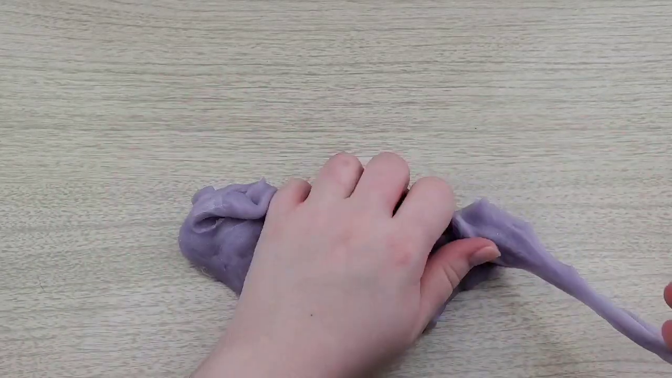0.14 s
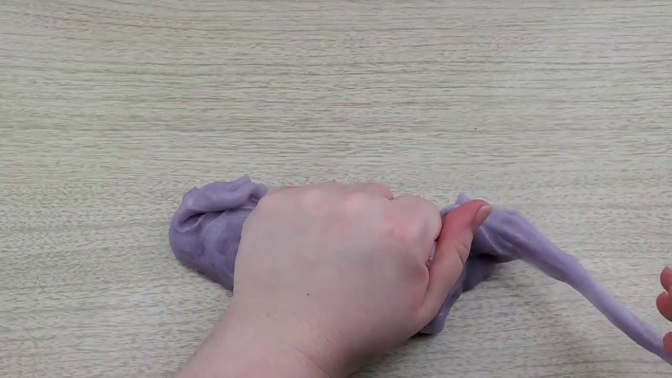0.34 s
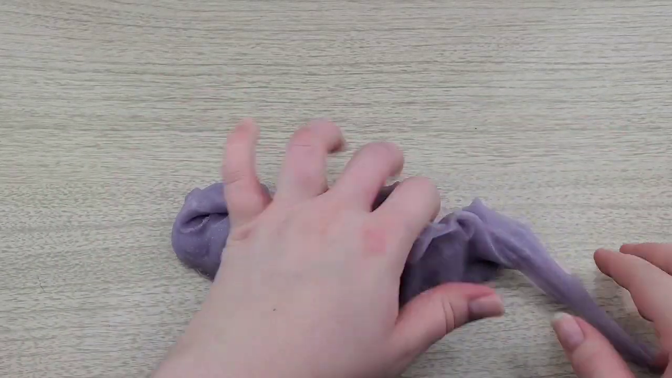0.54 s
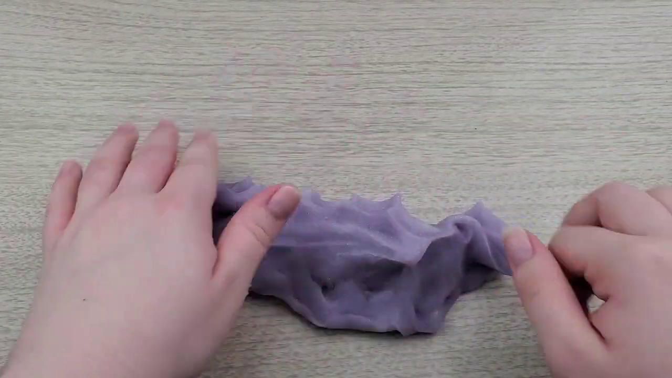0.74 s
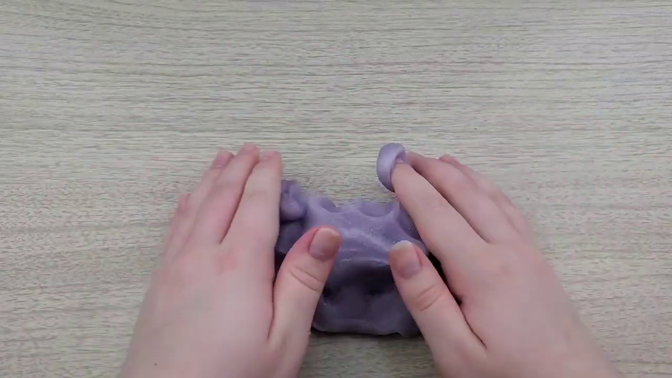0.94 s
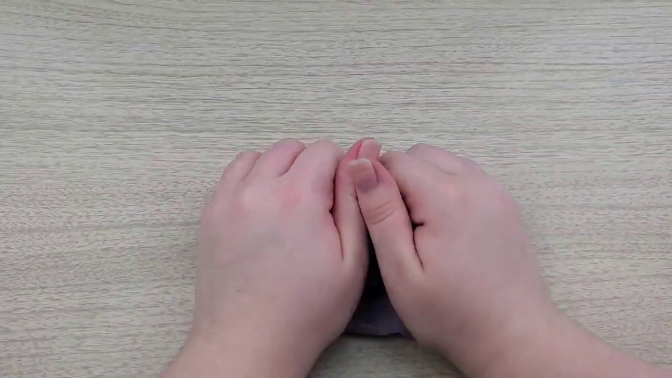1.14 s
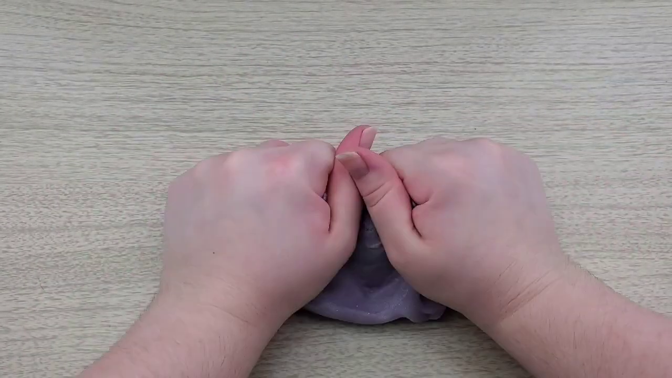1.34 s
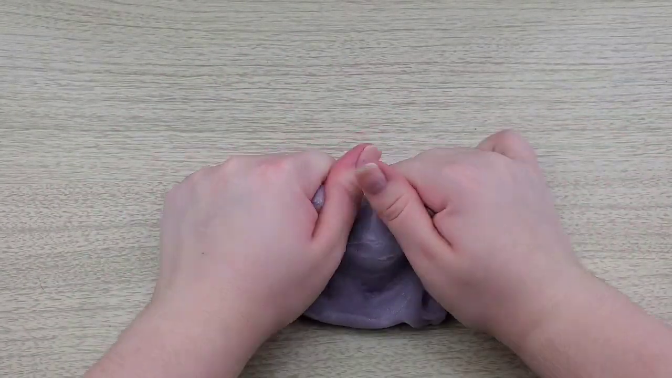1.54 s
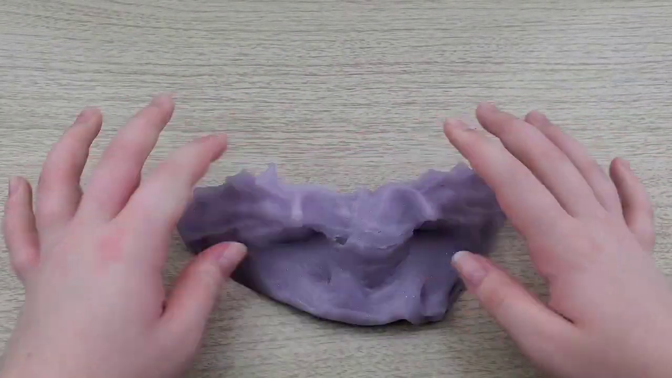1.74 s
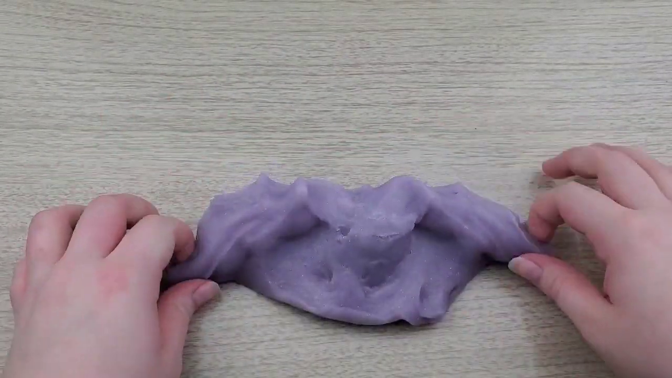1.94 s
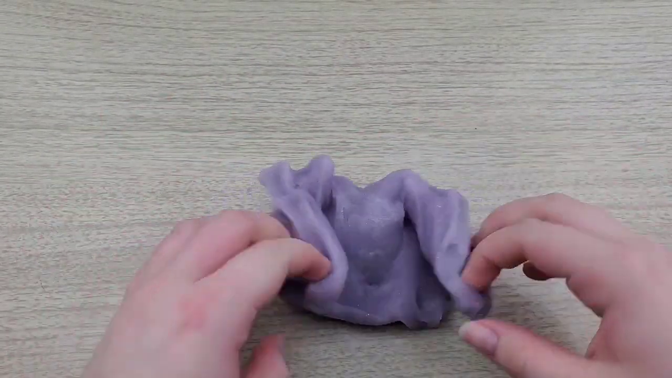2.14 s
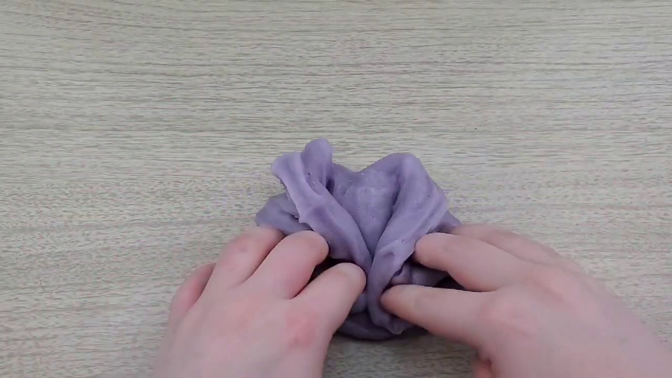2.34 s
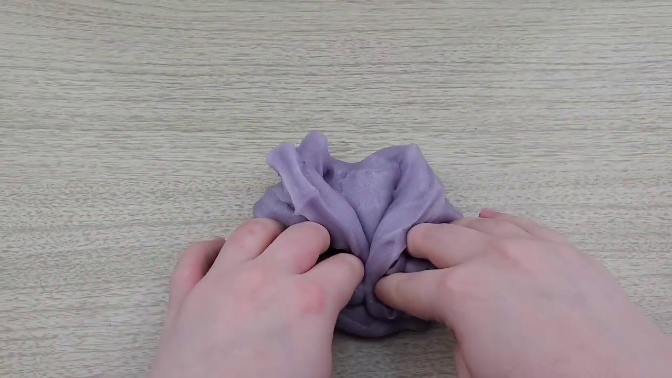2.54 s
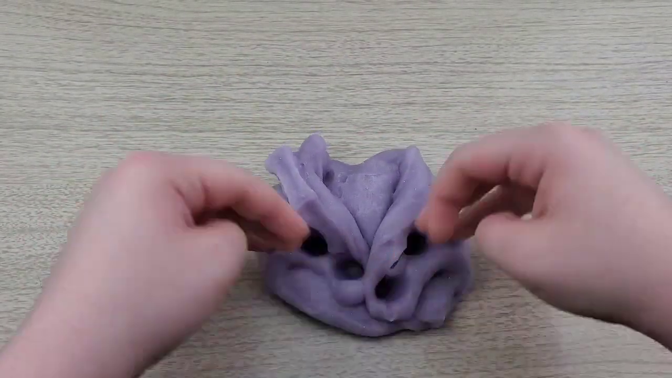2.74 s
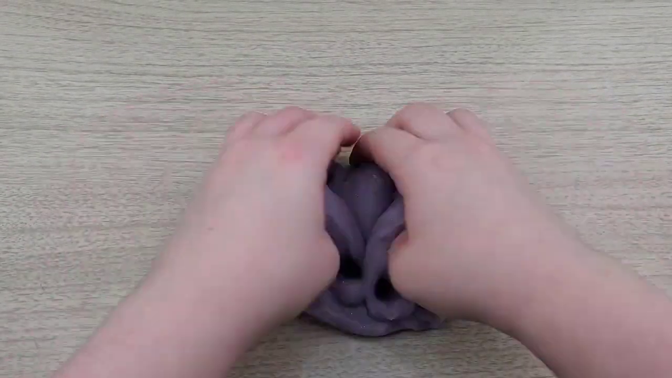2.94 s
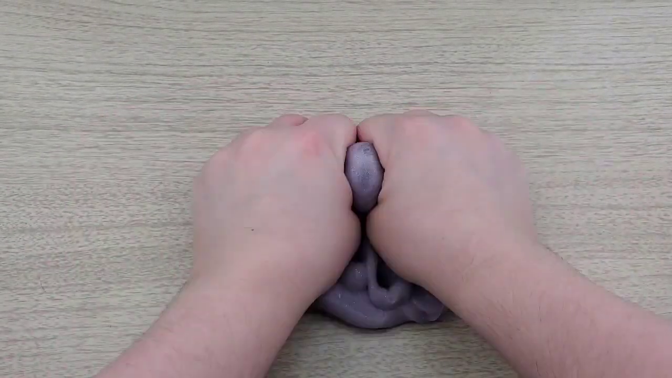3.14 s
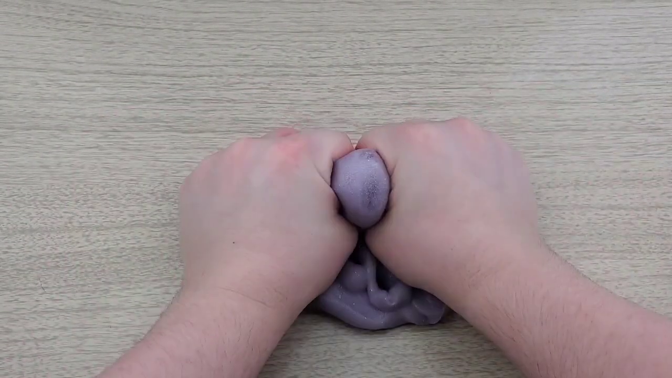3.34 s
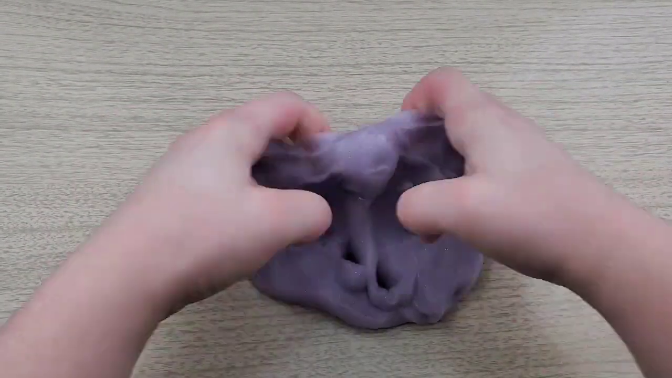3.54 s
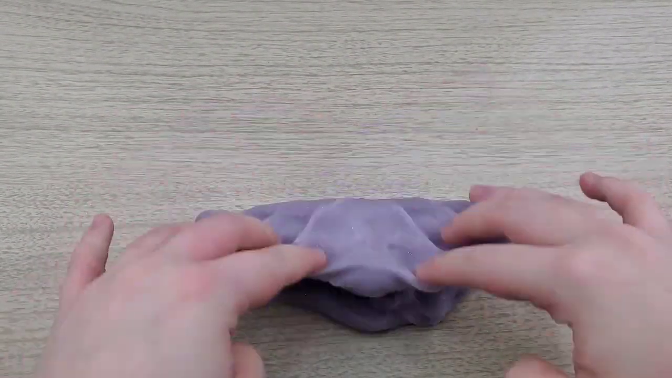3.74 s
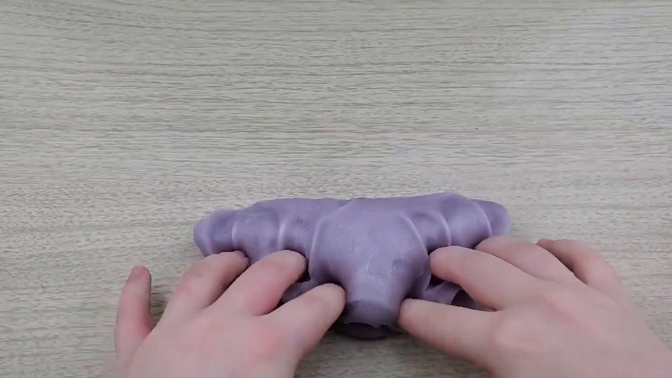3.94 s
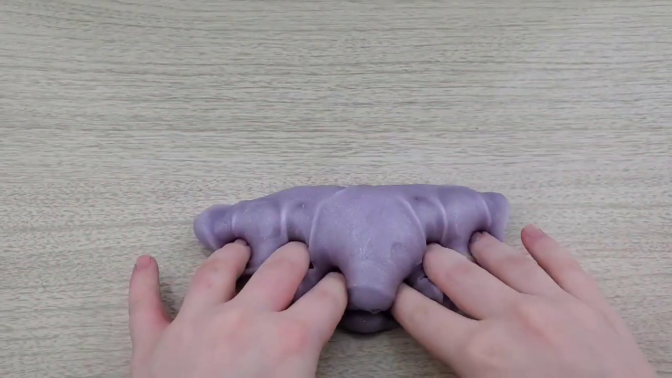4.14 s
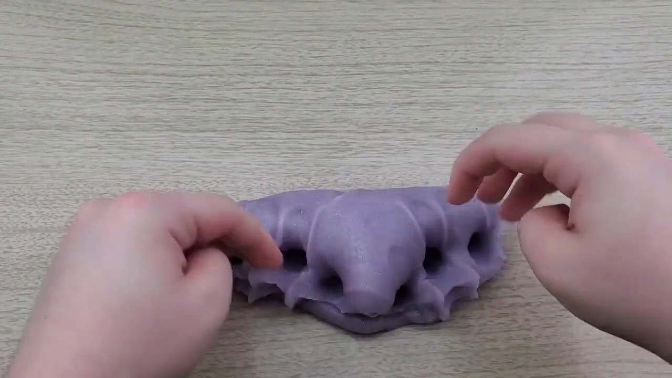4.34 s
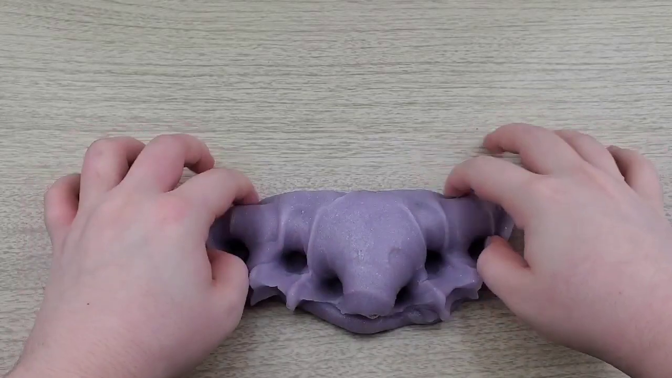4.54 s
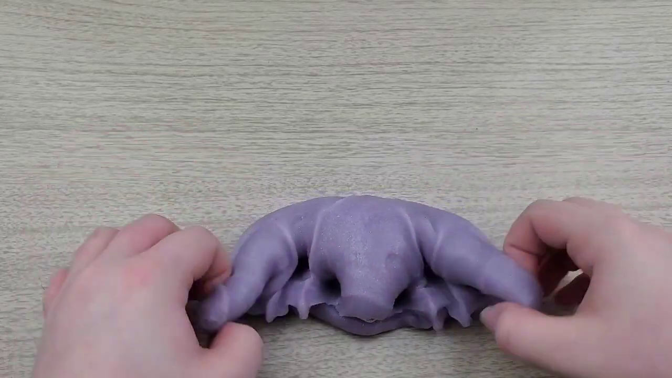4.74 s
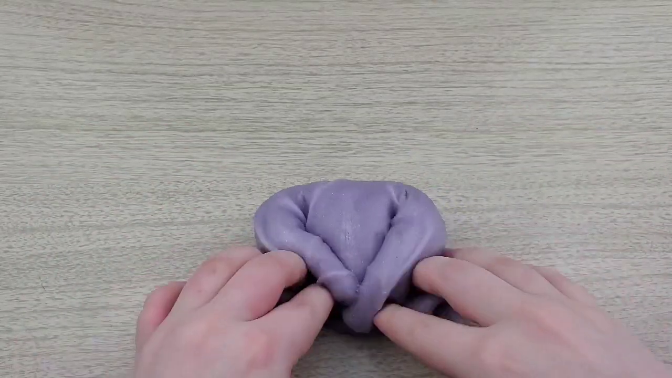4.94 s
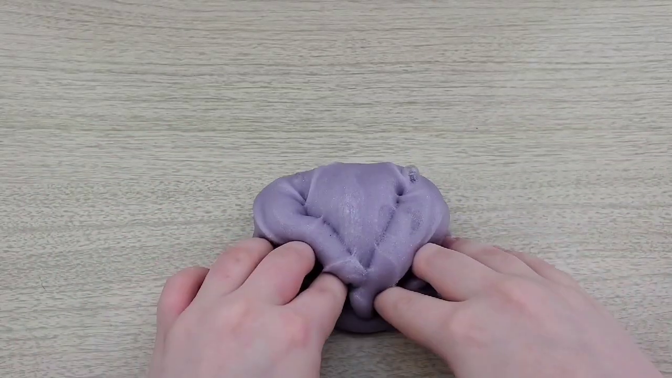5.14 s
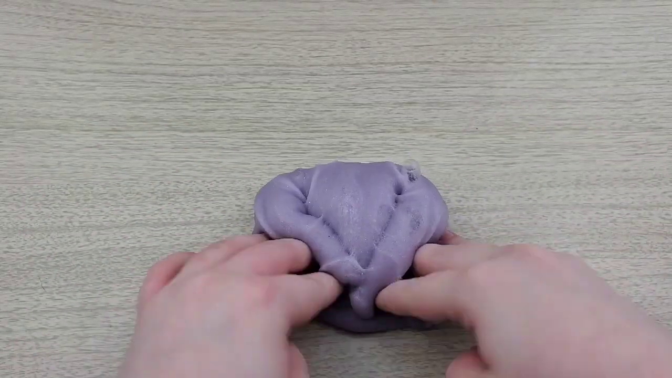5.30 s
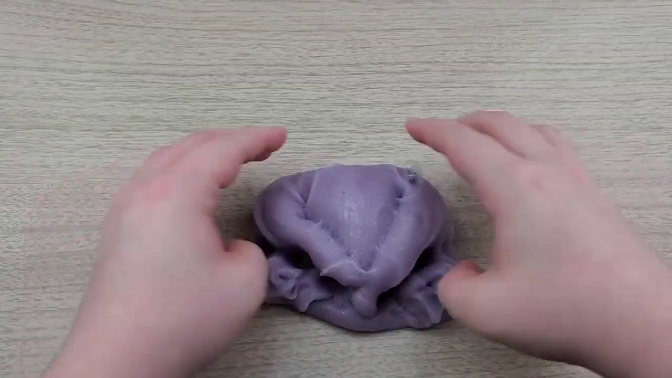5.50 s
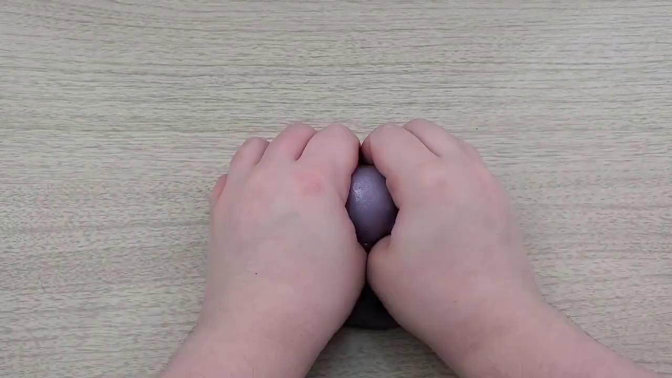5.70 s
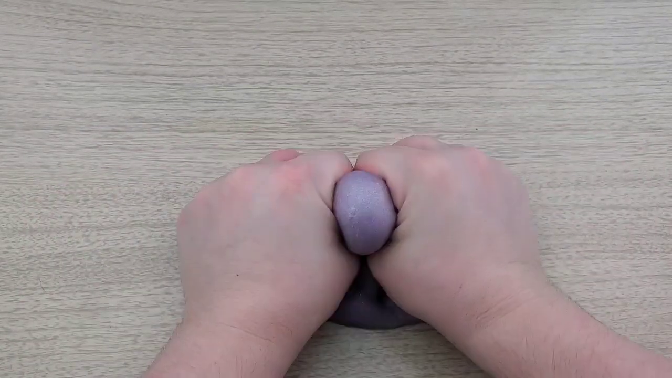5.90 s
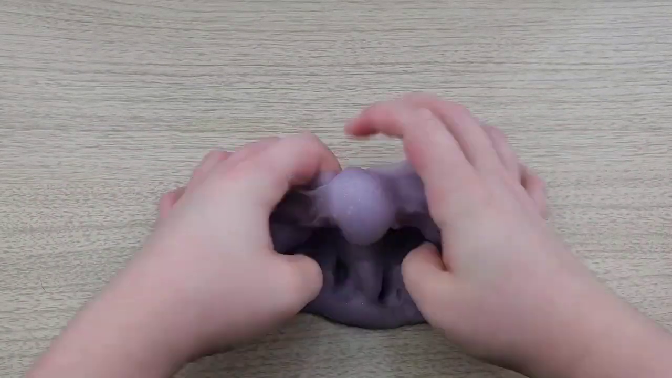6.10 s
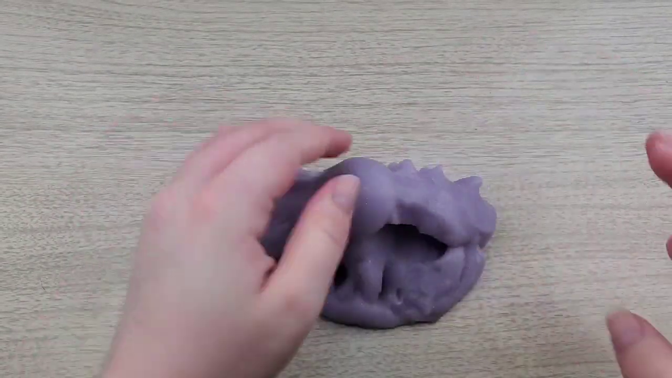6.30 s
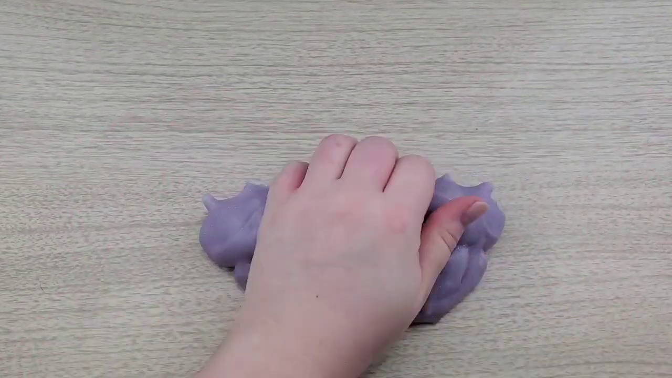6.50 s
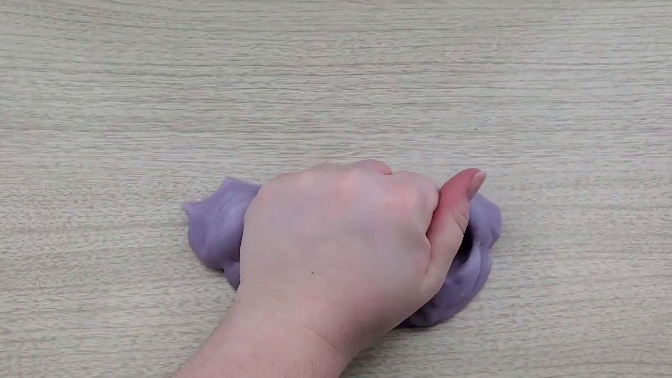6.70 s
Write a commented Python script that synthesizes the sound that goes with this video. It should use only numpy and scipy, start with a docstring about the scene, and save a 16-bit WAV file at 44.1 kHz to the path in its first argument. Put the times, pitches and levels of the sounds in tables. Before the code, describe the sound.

Hands knead thick slime on a wooden table: short bursts of wet squelchy pops, sticky crackles and soft knocks, separated by near-silent gaps.

```python
"""A wooden table top in a small quiet room: two hands knead thick slime close below a pair of microphone ports.
Trapped air pockets burst with a wet pop: torn noise snaps, spits and rings a rising pocket tone.
The sticky skin peels off the fingers with a fine crackle of noise bursts, part of it through hollow resonances.
Finger tips knock the table through the slime and ring its modes; a faint hum and low rumble fill the gaps."""
import sys
import numpy as np
from scipy import signal
from scipy.fft import rfft, irfft, next_fast_len
from scipy.io import wavfile
from scipy.ndimage import uniform_filter1d

SR = 44100
rng = np.random.default_rng(int(sys.argv[2]) if len(sys.argv) > 2 else 0)


def master_out(mix):
    """Clip the mix to full scale and print it as 16-bit PCM to the path in sys.argv[1]."""
    frames = np.transpose(np.atleast_2d(mix))
    ceiling = np.clip(frames, -1, 1)
    pcm = np.round(ceiling * 32767).astype(np.int16)
    wavfile.write(sys.argv[1], SR, pcm)


def boost_factor(decibels):
    """Convert a level in decibels to a linear amplitude factor."""
    exponent = np.asarray(decibels, float) / 20
    return 10 ** exponent


N = 302526
T = np.arange(N) / SR
SPOTS = 5  # places on the lump

# swells of peeling crackle, a pull may take more than one: peak_s, crackle_db, hollow_db, rise_s, fall_s
PEEL = [(0.0, -72, -81, .05, .05), (0.34, -69, -82, 0.035, 0.15), (0.431, -35.5, -47, 0.01, 0.16),
        (0.54, -52, -52, 0.17, 0.073), (0.732, -48, -48, 0.098, 0.072), (1.15, -72.5, -78.5, 0.12, 0.36),
        (1.29, -63, -73.5, 0.17, 0.24), (1.45, -56.5, -60.5, 0.066, 0.18), (1.59, -56.5, -67, 0.14, 0.11),
        (1.766, -49, -51.5, 0.046, .08), (1.829, -45.5, -47, 0.096, 0.11),
        (2.119, -64.5, -70, 0.057, 0.076), (2.292, -63, -73, 0.1, 0.1), (2.551, -70.5, -76.5, 0.23, 0.13),
        (2.78, -93, -76.5, .12, 0.13), (2.919, -64.5, -38.5, 0.019, 0.044),
        (3.21, -57.5, -59.5, 0.069, 0.26), (3.41, -46.5, -56.5, 0.098, 0.12),
        (3.7, -40.5, -41, 0.078, 0.13), (4.05, -77, -81, .25, 0.56), (4.481, -42.5, -69.5, 0.027, 0.1),
        (4.79, -58, -64.5, 0.057, 0.079), (4.951, -68.5, -81, .12, 0.17), (5.22, -72, -79, 0.11, 0.14),
        (5.539, -47.5, -42, 0.024, 0.088), (5.83, -69.5, -73.5, .1, .1), (5.93, -48.5, -57.5, 0.058, .08),
        (6.0, -60, -30, 0.061, 0.041), (6.05, -40, -66, 0.049, 0.18), (6.13, -50.5, -47, .05, 0.086),
        (6.293, -42, -41, 0.085, 0.08), (6.62, -76, -99, 0.05, 0.23), (6.802, -49.5, -52.5, 0.044, 0.048),
        (6.86, -77, -72, 0.055, .05)]


def unit(x):
    """Scale to an rms of 1."""
    return x / np.sqrt(np.mean(x ** 2))


def colour(x, points):
    """Shape the spectrum by (Hz, dB) points, without phase shift; -90 dB outside them."""
    hz, db = np.transpose(points)
    length = x.shape[-1]
    size = next_fast_len(length)
    f = np.arange(size // 2 + 1) * SR / size + 1
    gain = boost_factor(np.interp(np.log(f), np.log(hz), db, left=-90, right=-90))
    return irfft(rfft(x, size) * gain, size)[..., :length]


def band(x, hz, width_hz):
    """One resonance, gain 1 at its centre."""
    return signal.lfilter(*signal.iirpeak(hz, hz / width_hz, fs=SR), x)


def pass_filter(x, order, hz, kind):
    """Butterworth low or high pass."""
    return signal.sosfilt(signal.butter(order, hz, kind, fs=SR, output="sos"), x)


def decay(t, t60_s):
    """Exponential fall by 60 dB in t60_s."""
    return np.exp(-np.log(1000) * t / t60_s)


def pair(size):
    """Noise at two ports a hand apart: the same in the bass, unrelated in the treble."""
    mid, side = rng.standard_normal((2, size))
    side = pass_filter(side, 2, 900, "high")
    return np.array([.88 * (mid + side), mid - side])  # the left port hears a little less


def wander(hold_s):
    """Slow chance of spread 1 that changes over about hold_s."""
    size = int(hold_s * SR) + 1
    smooth = uniform_filter1d(rng.standard_normal(N), size)
    return unit(uniform_filter1d(smooth, size))


def swells(s, db, rise_s, fall_s, drop_db=21.5, roundness=1.68):
    """Level in dB of overlapping swells, drop_db down one rise or fall time from each peak."""
    coarse = T[::64]
    late = coarse - np.asarray(s)[:, None]
    far = np.maximum(-late / np.reshape(rise_s, (-1, 1)), late / np.reshape(fall_s, (-1, 1)))
    # roundness: 1 pointed, 2 round
    power = np.sum(boost_factor(np.asarray(db)[:, None] - drop_db * far ** roundness) ** 2, axis=0)
    return np.interp(T, coarse, 10 * np.log10(power + 1e-14))


def strikes(s, db, shapes):
    """Lay one short shape of given energy at each moment, taking the spots on the lump in turn."""
    out = np.zeros((SPOTS, N + shapes.shape[1]))
    for k, (at, gain, shape) in enumerate(zip(s, boost_factor(db), shapes)):
        i = int(at * SR)
        out[k % SPOTS, i:i + len(shape)] += gain * shape / np.sqrt(np.sum(shape ** 2))
    return out[:, :N]


def background():
    """Table rumble that wavers and swells under the arms, a steady hum, and the room's still air."""
    # weight of the arms coming down on the table: peak_s, rumble_db
    lean = [(0.46, -59), (1.83, -58.5), (2.1, -60), (2.989, -49.5), (3.171, -46), (3.46, -56), (3.72, -47),
            (4.53, -49.5), (4.771, -53.5), (5.6, -50), (5.829, -56.5), (5.98, -58), (6.358, -67),
            (6.86, -59.5)]
    # rumble spectrum: hz, db_per_hz
    rumble_colour = [(20, -31.5), (40, -10), (60, 0.5), (90, -9), (150, -17), (300, -18.5), (420, -48.5)]
    # hum partials: hz, rms_db
    hum_partials = [(190.6, -87.5), (238.3, -84.5), (286, -80.5), (429, -100)]
    # still-air spectrum: hz, db_per_hz
    air_colour = [(100, 2), (300, -12), (400, -15), (800, -24.5), (16000, -32.5)]
    rise_s, fall_s = 0.075, 0.1
    rest_db, waver_db, waver_s, air_db = -68, 0.5, 0.12, -81.5

    s, lean_db = np.transpose(lean)
    arms = boost_factor(swells(s, lean_db, rise_s, fall_s))
    rest = boost_factor(rest_db + waver_db * wander(waver_s))
    common, apart = rng.standard_normal((2, N))
    low = common + .17 * apart * np.array([[1], [-1]])
    rumble = np.hypot(arms, rest) * unit(colour(low, rumble_colour))

    hum = np.zeros(N)
    for hz, db in hum_partials:
        hum += np.sqrt(2) * boost_factor(db) * np.sin(2 * np.pi * (hz * T + rng.random()))
    return rumble + hum + boost_factor(air_db) * unit(colour(pair(N), air_colour))


def peel(per_s=140.0, spread_db=5.0, hiss_db=4.0, smear_s=0.0025, clump_db=2.0, clump_s=0.0064):
    """Tiny threads tear all over the skin, a few much louder; hollows of the hands colour them in clumps."""
    # bright crackle spectrum: hz, db_per_hz
    crackle_colour = [(2200, -20.5), (3300, -6.5), (4600, 2), (8500, -3), (14000, -2.5), (16000, -5)]
    # resonances of cupped hands and folds: centre_hz, width_hz (each of two passes), relative_db
    hollows = [(550, 400, -6), (900, 260, -0.5), (1455, 260, -1), (1840, 1800, -3.5)]
    # wet air squeezed out between closed fists: peak_s, level_db, rise_s, fall_s
    squishes = [(1.4, -67, 0.13, .25), (3.38, -54.5, 0.18, 0.13), (5.9, -55, 0.035, 0.057)]
    # squish resonance: centre_hz, width_hz (each of two passes)
    squish_band = (2380, 2100)

    chance, size = rng.random((2, N))
    ticks = (chance < per_s / SR) * boost_factor(-spread_db * np.log(size + 1e-9))
    bursts = signal.lfilter([1], [1, -np.exp(-1 / (smear_s * SR))], ticks)
    threads = (unit(bursts) + boost_factor(hiss_db)) * pair(N)

    crackle = colour(threads, crackle_colour)
    hollow = np.zeros((2, N))
    for hz, width_hz, db in hollows:
        clumps = boost_factor(db + clump_db * wander(clump_s))
        hollow += clumps * band(band(threads, hz, width_hz), hz, width_hz)
    squish = band(band(threads, *squish_band), *squish_band)

    s, crackle_db, hollow_db, rise_s, fall_s = np.transpose(PEEL)
    crackle_level = boost_factor(swells(s, crackle_db, rise_s, fall_s))
    hollow_level = boost_factor(swells(s, hollow_db, rise_s, fall_s))
    squish_level = boost_factor(swells(*np.transpose(squishes)) + clump_db * wander(clump_s))
    return squish_level * unit(squish) + crackle_level * unit(crackle) + hollow_level * unit(hollow)


def tiny_pockets(count=150, low_hz=1500, high_hz=7500):
    """Small pockets burst at random moments, following the pull on the skin up to a ceiling."""
    # event energy over the crackle level: ring, snap, spit
    over_db, scatter_db = [20, 21.5, 23.5], 6
    top_db = -61.5  # a pull above this crackle level bursts them no louder
    draw, scatter = rng.random((count, 2)), rng.standard_normal((count, 3))
    s = draw[:, 0] * T[-1]
    hz = low_hz + (high_hz - low_hz) * np.sqrt(draw[:, 1])
    at, crackle_db, _, rise_s, fall_s = np.transpose(PEEL)
    pull_db = np.interp(s, T, swells(at, crackle_db, rise_s, fall_s))
    db = np.minimum(pull_db, top_db)[:, None] + scatter_db * scatter
    return np.column_stack([s, hz, db + over_db])


def pops(cycles_at_1k=8.6, glide=0.025, crack=1.6):
    """The film over a pocket tears; it snaps, spits and rings the pocket, which rises as it opens."""
    # pockets bursting at set moments, loud and faint, relative energies:
    # start_s, pitch_hz, ring_db, snap_db, spit_db
    set_pockets = [(0.364, 930, -37, -35, -40), (0.384, 7440, -9, -24, -13), (0.394, 6000, 2, -58, -3),
                   (0.404, 5160, 8, -39, -21), (0.421, 7300, 0.5, -31, -11), (0.445, 5700, -3.5, -12, -3.5),
                   (0.458, 6740, 1, -22, 2.5), (0.473, 6000, -29, -36, -2), (0.528, 930, -17, -14.5, -33),
                   (0.558, 5800, -36, -17, -43), (0.578, 7820, -18.5, -46.5, -26.5),
                   (1.031, 7220, -50.5, -60.5, -39.5), (1.262, 4880, -10.5, -39, -24.5),
                   (1.323, 1560, -40, -45, -40), (1.37, 3520, -33, -50, -41), (1.387, 2740, -40, -60, -46),
                   (1.396, 7440, -33, -44, -30), (1.423, 1480, -23.5, -24, -20),
                   (1.439, 7060, -26, -42, -21), (1.479, 7500, -18, -26, -15),
                   (1.525, 6200, -31, -27.5, -23), (1.574, 7500, -40, -61, -20),
                   (1.587, 7050, -20, -19, -10), (1.629, 5790, -41, -45, -20), (1.652, 4930, -23, -41, -16),
                   (1.806, 1570, -16, -18, -46), (2.069, 4930, -58.5, -53, -48.5),
                   (2.747, 3080, -45.5, -55.5, -58), (2.782, 1540, -42, -62, -70.5),
                   (2.879, 1340, -14, -20.5, -34), (2.89, 5000, -1.5, -3, 0.5), (2.915, 904, 5, 5.5, 1),
                   (2.924, 880, 3, -12, -10), (3.142, 834, -38, -23.5, -38), (3.168, 1120, -38.5, -23, -17),
                   (3.219, 1580, -33, -37, -29), (3.241, 1920, -27, -28, -30), (3.286, 7000, -5, -56, -1.5),
                   (3.372, 2550, -30, -28, -16.5), (3.403, 6500, -30, -23, -29),
                   (3.411, 5720, -21, -26, -2), (3.454, 6960, -24, -28, -17),
                   (3.491, 8340, -36, -24.5, -14.5), (3.604, 6940, -13, -37, -3),
                   (3.655, 4740, -30.5, -4, -16.5), (3.679, 6400, -2, -1.5, -15),
                   (3.707, 3010, -15.5, -7.5, -16), (4.115, 1687, -45.5, -49, -60.5),
                   (4.388, 6440, -49.5, -64, -49), (4.45, 4480, -3.5, -14, -7.5), (4.464, 5180, -9, 0, 0.5),
                   (4.485, 6780, -3.5, 1, 2.5), (4.727, 825, -34.5, -31, -53.5),
                   (4.886, 7200, -31.5, -31.5, -30.5), (4.994, 6120, -29.5, -58, -28.5),
                   (5.039, 5250, -44.5, -57, -36), (5.151, 7000, -57, -52, -38),
                   (5.517, 1210, -11.5, -8, -16), (5.53, 5270, -18, -1.5, -5), (5.543, 7200, -4, -3, -28),
                   (5.553, 845, 1, -8.5, -9), (5.774, 6700, -33.5, -40.5, -25),
                   (5.815, 7800, -47.5, -37, -21), (5.861, 3420, -44, -40, -36),
                   (5.897, 6800, -43, -27, -14), (5.939, 1636, 16.5, 4.5, -8.5), (5.964, 3980, 11, 0, -4.5),
                   (6.001, 5150, 11, -17, -16), (6.004, 5660, 10.5, -25, -15), (6.02, 4770, 0, -3, 0),
                   (6.039, 5300, -9, -23, -0.5), (6.054, 6040, -15, 5, 0.5), (6.1, 6510, -9, -1, 8.5),
                   (6.263, 1290, -12, -13.5, -28), (6.302, 3240, -13, -15.5, -31.5),
                   (6.614, 5770, -27, -40.5, -24), (6.627, 6280, -48.5, -60.5, -28),
                   (6.69, 7180, -40, -48, -38), (6.791, 894, -15.5, -23.5, -19.5),
                   (6.815, 900, -36, -34, -25), (6.851, 5100, -33, 2, -11)]
    # wet snap spectrum: hz, db_per_hz
    snap_colour = [(600, -2.5), (1000, -3), (2000, -6.5), (3000, -4), (5000, 2), (7500, -5), (9000, -21.5)]
    # spit spectrum: hz, db_per_hz
    spit_colour = [(6500, -15), (8500, -2), (11000, -0.5), (14500, 3), (16000, -3)]
    tear_ms_at_1k, tear_power = 2, 1.2  # smaller pockets tear much faster
    extra_ms = [0.56, 0.81, 0]  # snap and spit outlast the tear
    damp_power, most_cycles = .55, 2.8  # the cap rules below about 7.7 kHz; above, fewer cycles
    thin_db_per_octave = 2.5  # smaller pockets snap with less body

    s, hz, ring_db, snap_db, spit_db = np.vstack([set_pockets, tiny_pockets()]).T
    t = np.arange(900) / SR
    turns, khz = hz[:, None] * t, hz[:, None] / 1000
    cycles = np.minimum(cycles_at_1k / khz ** damp_power, most_cycles)
    phase = turns * (1 + glide * turns / (cycles + turns))
    pocket = np.sin(2 * np.pi * phase) * np.exp(-turns / cycles)

    tear = rng.standard_normal((len(s), 3, len(t)))
    tear[:, :, 0] = crack  # the first rupture is one sharp click
    lasts_ms = tear_ms_at_1k / khz ** tear_power + extra_ms
    tear *= np.exp(-1000 * t / lasts_ms[:, :, None])
    tear = np.roll(tear, 20, axis=2)  # room ahead for the colouring's spread

    ring = signal.fftconvolve(tear[:, 2], pocket, axes=1)[:, :len(t)]
    fade = np.minimum(np.arange(len(t))[::-1] / 300, 1)
    snap = fade * colour(tear[:, 0], snap_colour)
    spit = fade * colour(tear[:, 1], spit_colour)
    body = pass_filter(snap, 2, 1600, "low")
    body_gain = boost_factor(-thin_db_per_octave * np.log2(khz / 6.3))
    snap = snap - (1 - body_gain) * body
    return strikes(s, ring_db, ring) + strikes(s, snap_db, snap) + strikes(s, spit_db, spit)


def room():
    """From one spot to both ports: the direct sound, quick echoes from table and hands, then the walls."""
    # wall reverberation bands: centre_hz, t60_s
    wall_bands = [(300, 0.23), (600, 0.22), (1400, 0.3), (3700, 0.23), (10000, 0.071)]
    echo_db, echo_t60_s, walls_db = 0, 0.034, -10

    def even(x):
        """Scale to a mean energy of 1 per port."""
        return x / np.sqrt(np.sum(x ** 2) / 2)

    t = np.arange(int(.45 * SR)) / SR
    noise = pair(len(t))
    walls = sum(band(noise, hz, 1.2 * hz) * decay(t, t60_s) for hz, t60_s in wall_bands)
    walls = walls * (1 - np.exp(-t / .003))
    echoes = pair(len(t)) * decay(t, echo_t60_s)
    out = boost_factor(echo_db) * even(echoes) + boost_factor(walls_db) * even(walls)
    out[0, 0] += .75
    out[1, rng.integers(2, 8)] += .85  # the right port is a little further away
    return out


def knocks(push_s=0.0013, dull_db=4.0, thud_db=-3.5, thud_t60_s=0.17):
    """A ragged push through slime sets the table top ringing; a soft push reaches only the low modes."""
    # finger tips reaching the table, softness dulls: start_s, energy_db, softness (0-8)
    tips = [(0.405, -10.5, 0.17), (0.458, -21, 0.11), (0.528, -29, 1.1), (1.43, -48, 1.2),
            (1.806, -32, 0.88), (2.569, -45.5, 2), (2.878, -19.5, 3.7), (2.889, -10, 0.55),
            (2.915, -16, 1.3), (2.924, -6, 0.1), (3.142, -12, 5.3), (3.184, -22.5, 5.3), (3.403, -38, 0.73),
            (3.454, -47, 3.3), (3.656, -20.5, 1.5), (3.679, -11.5, 0.42), (3.706, -14, 0.6),
            (4.45, -11, 0.71), (4.464, -7.5, 0.35), (4.485, -3, 0.83), (4.728, -21.5, 2.1),
            (4.761, -36, 2.4), (5.543, -12, 2.7), (5.555, -10.5, 0.11), (5.939, -14.5, 1.9),
            (6.001, -41, 0.19), (6.054, -14.5, 0.72), (6.1, -16, 0.3), (6.263, -26.5, 1.8),
            (6.758, -35.5, 2.5), (6.791, -17.5, 1.5), (6.851, -15.5, 0.43)]
    # table-top modes: hz, level_db, t60_s
    table_modes = [(336, 2.5, 0.17), (429.4, -5, 0.13), (513, -1, .12), (640, -3.5, 0.11),
                   (681, -2.5, 0.13), (880, -5, 0.1), (930, -7, .09), (1224, -8.5, 0.1)]
    # slime-damped board: hz, db_per_hz
    thud_colour = [(180, -22), (280, -4.5), (450, -6), (800, -3.5), (1300, -18)]
    detune = .017  # rms share by which the lump's weight shifts each mode from blow to blow

    hz, db, t60_s = np.transpose(table_modes)[:, :, None]
    t = np.arange(9000) / SR
    s, knock_db, soft = np.transpose(tips)
    load = 1 + detune * rng.standard_normal((len(s), len(hz), 1))
    reach = boost_factor(db - dull_db * soft[:, None, None] * np.log2(hz / hz[0]))
    modes = np.sum(reach * np.sin(2 * np.pi * hz * load * t) * decay(t, t60_s), axis=1)
    push = rng.standard_normal((len(s), 1500)) * np.exp(-t[:1500] / push_s)
    ringing = signal.fftconvolve(push, modes, axes=1)

    # between the clear modes lie many damped ones that blur into a thud
    thud = colour(rng.standard_normal((len(s), len(t))), thud_colour)
    thud = thud * decay(t, thud_t60_s) * (1 - np.exp(-t / push_s))
    return strikes(s, knock_db, ringing) + strikes(s, knock_db + thud_db, thud)


def scene():
    """Pops reach the ports through the room; both ports hear the table top nearly alike."""
    still = background()
    skin = peel()
    small = pass_filter(pops(), 2, 350, "high")  # the pops carry no bass below about 350 Hz
    heard = sum(signal.fftconvolve(spot[None], room(), axes=1)[:, :N] for spot in small)
    top = pass_filter(knocks(), 3, 230, "high")  # the knocks carry little below about 230 Hz
    table = top.sum(0) + .3 * (top[0] - top[1]) * np.array([[1], [-1]])
    return boost_factor(-3.5) * heard + table + skin + still


def roll_off(x):
    """The treble ends steeply here."""
    return signal.sosfilt(signal.butter(12, 16990, fs=SR, output="sos"), x)


def record(dry):
    """The loudest peaks are rounded and the top is cut at 15.9 kHz."""
    rounded = .85 * np.tanh(dry / .85)
    top_cut = signal.ellip(8, .2, 40, 15900, fs=SR, output="sos")
    mix = signal.sosfilt(top_cut, rounded)
    return roll_off(mix)


dry = scene()
out = record(dry)
master_out(out)
```